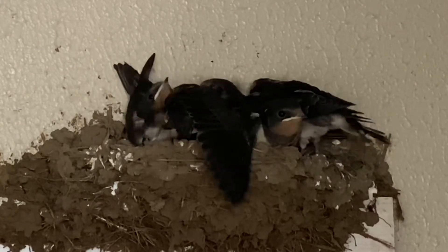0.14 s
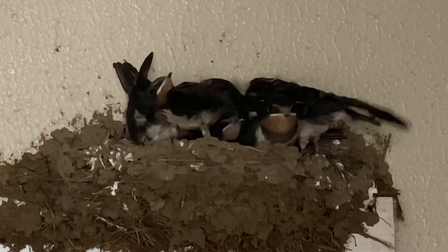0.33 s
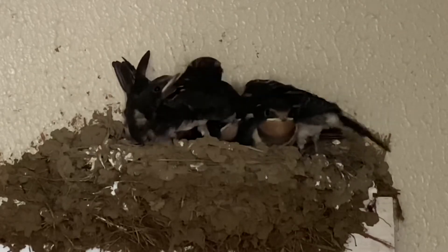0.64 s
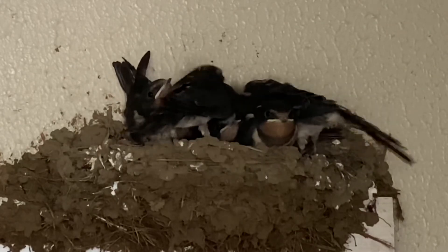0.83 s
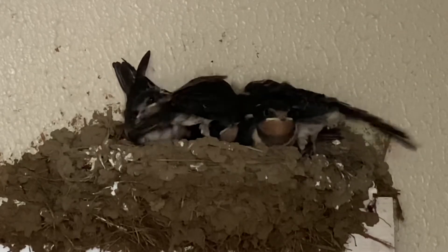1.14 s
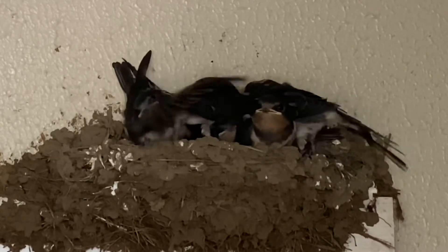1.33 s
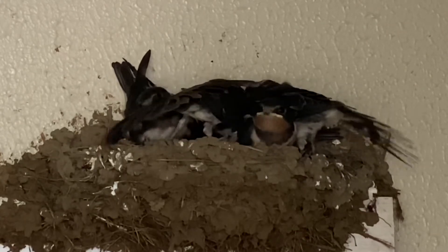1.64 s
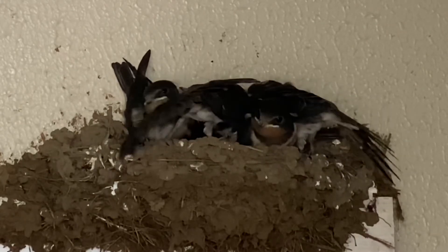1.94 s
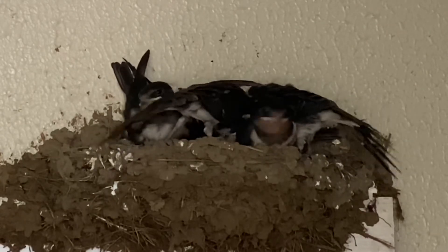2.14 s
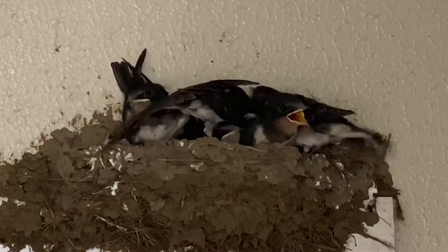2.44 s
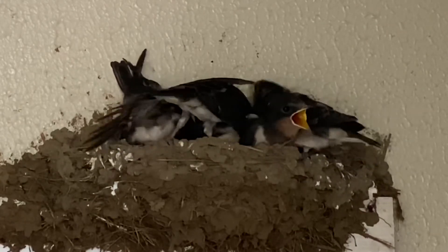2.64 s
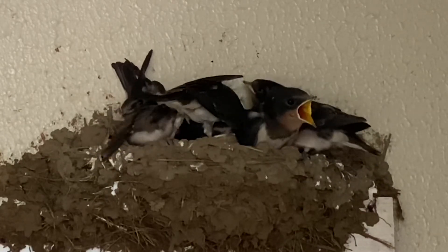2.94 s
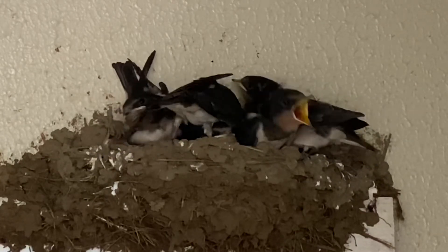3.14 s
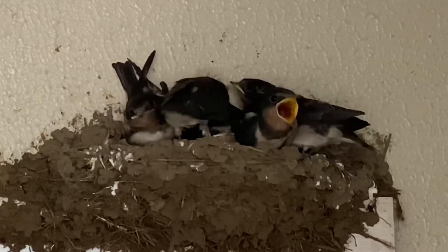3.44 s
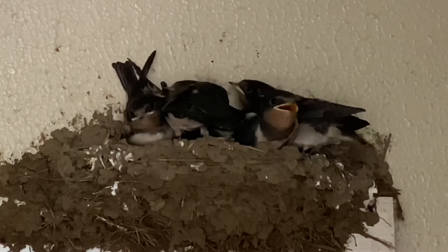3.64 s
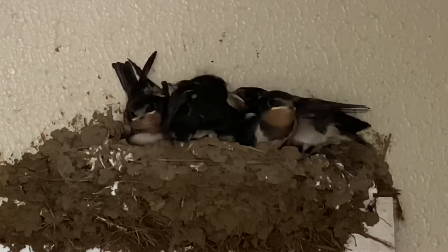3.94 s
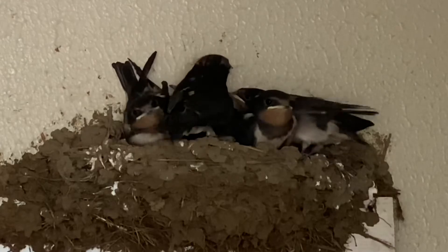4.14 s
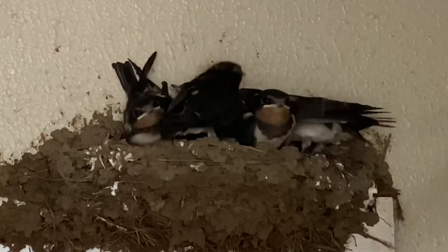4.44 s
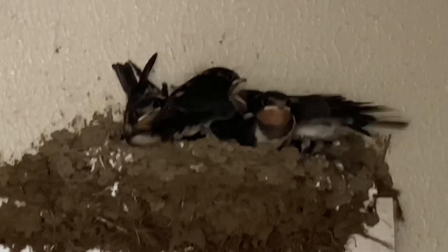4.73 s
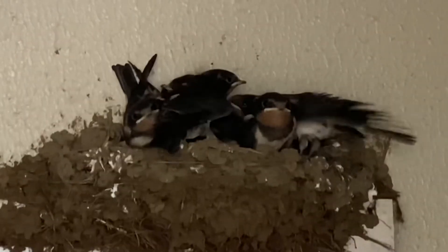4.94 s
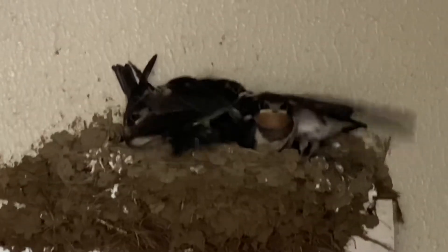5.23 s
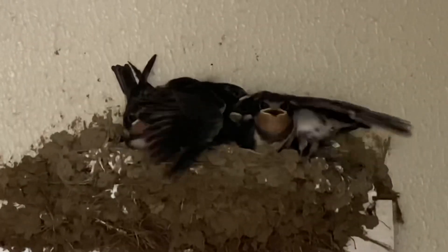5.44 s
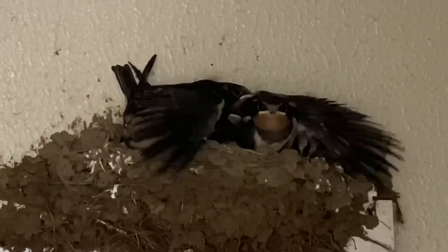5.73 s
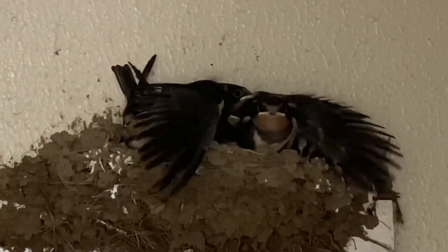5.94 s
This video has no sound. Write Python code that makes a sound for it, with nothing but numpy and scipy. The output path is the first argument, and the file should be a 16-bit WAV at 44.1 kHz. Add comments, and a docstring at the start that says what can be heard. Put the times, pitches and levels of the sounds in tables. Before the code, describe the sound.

Young swallows call from a mud nest close to the microphone beneath a hard, reverberant roof. Short raspy screeches and soft whimpers come first, then a run of long hoarse begging cries, quiet peeps, and sharp upswept squeaks. A heavy puff of air thumps the microphone late on, followed by another screech and swishing wings. A faint distant motor hum fades early over low outdoor rumble.

```python
"""A mud nest under a hard, echoing roof: swallow nestlings beg with hoarse, mostly long screeches, upswept
chirps and squeaks, and soft whimpers. Each voice is syrinx pulses and chopped hiss in a moving throat resonance.
They shuffle and flap: filtered noise makes swishing feathers, gritty scrabbling feet and ticking claws.
A gust of air thumps on the microphone as short swinging eddies inside a lumpy draught of noise.
A distant motor, a few wavering harmonics, hums and fades over a low outdoor rumble."""
import sys
import numpy as np
from scipy import signal
from scipy.fft import rfft, irfft, next_fast_len
from scipy.io import wavfile
from scipy.ndimage import uniform_filter1d, map_coordinates

SR = 44100
rng = np.random.default_rng(int(sys.argv[2]) if len(sys.argv) > 2 else 0)


def unload_wav(signal):
    """Save mono or channel-first audio to the path in sys.argv[1] as 16-bit WAV at rate SR, clipped to [-1, 1]."""
    wavfile.write(
        sys.argv[1],
        SR,
        np.round(np.clip(np.atleast_2d(signal).T, -1, 1) * 32767).astype(np.int16),
    )


N = 268569

# colour of chirps and whimpers: [f/Hz, relative level/dB]
SOFT_CALL_COLOUR = [(300, -23.5), (1000, 1), (1600, 3.5), (3000, -0.5), (4200, -3), (5300, -4.5),
                    (7300, -9), (8700, -13), (11500, -11.5), (15500, -17)]

FADE_DB = 17.5   # every call fades in from, and out to, this far below its level
RASP_ROUGH = .92   # roughness (0-1) as a sweep starts, and as screeches and sweeps die away


def from_db(db):
    """Decibels to gain."""
    return 10 ** (np.asarray(db) / 20)


def rms_one(x):
    """Scale to unit power."""
    return x / np.sqrt(np.mean(x ** 2) + 1e-20)


def at_hz(points, hz):
    """Read a table on a log-frequency axis."""
    known_hz, values = np.transpose(points)
    return np.interp(np.log(np.maximum(hz, 1)), np.log(np.maximum(known_hz, 1)), values)


def coloured(x, spectrum):
    """Filter a sound by the gains of an [f/Hz, level/dB] table."""
    size = next_fast_len(2 * len(x))   # padded so that the filter does not wrap round
    gain = from_db(at_hz(spectrum, np.fft.rfftfreq(size, 1 / SR)))
    return irfft(rfft(x, size) * gain, size)[:len(x)]


def filtered(x, order, edges_hz, kind):
    """Butterworth filter."""
    return signal.sosfilt(signal.butter(order, edges_hz, kind, fs=SR, output="sos"), x)


def drift(rate, size):
    """Smooth random wander of spread about 1 that changes about rate times a second."""
    knots = np.arange(size) * rate / SR
    return map_coordinates(rng.standard_normal(int(knots[-1]) + 2), [knots], order=3, mode="nearest")


def bell(t, centre, half_length):
    """A smooth swell and fade."""
    return np.exp(-np.minimum(((t - centre) / half_length) ** 2, 50))


def resonance(x, centre_hz, width_hz):
    """A two-pole resonance of peak gain 1 whose centre and width may move, stepped in short blocks."""
    out, state = np.zeros(len(x)), np.zeros(2)
    centre_hz = np.broadcast_to(centre_hz, len(x))
    radius = np.broadcast_to(np.exp(-np.pi * width_hz / SR), len(x))
    for i in range(0, len(x), 64):
        r = radius[i]
        zeros = [(1 - r * r) / 2, 0, (r * r - 1) / 2]
        poles = [1, -2 * r * np.cos(2 * np.pi * centre_hz[i] / SR), r * r]
        out[i:i + 64], state = signal.lfilter(zeros, poles, x[i:i + 64], zi=state)
    return out


def outdoors(t, waver=0.0049, motor_hz=102.7):
    """Low rumble of coloured noise and the wavering harmonics of a far motor that fades away."""
    # rumble colour: [f/Hz, relative level/dB]
    rumble_colour = [(20, -24.5), (40, -12.5), (63, 7), (90, -3), (130, -2.5), (220, -12), (350, -17.5),
                     (700, -24.5), (1500, -29), (4000, -43.5), (8000, -53), (15000, -59.5)]
    # rumble level over time: [t/s, level/dB]
    rumble_levels = [(0, -57), (.7, -56), (1.8, -57), (3.9, -54.5), (5.05, -56), (5.17, -61.5),
                     (6.09, -65.5)]
    # motor harmonics: [multiple of motor_hz, level/dB, steady until t/s, then fading/dB per s]
    motor_orders = [(2, -63.5, 1, 3.03), (3, -69.5, 0.93, 9.8), (4, -71.5, 1.3, 11)]
    rumble = rms_one(coloured(rng.standard_normal(N), rumble_colour))
    rumble = rumble * from_db(np.interp(t, *np.transpose(rumble_levels)))
    phase = 2 * np.pi * np.cumsum(motor_hz * (1 + waver * drift(5.4, N))) / SR
    hum = np.zeros(N)
    for multiple, db, until, fade in motor_orders:
        level_db = db - fade * np.maximum(t - until, 0) + 1.1 * drift(9.8, N)
        hum += from_db(level_db) * np.sin(round(multiple) * phase)
    return rumble + np.sqrt(2) * hum   # the root turns RMS level into sine amplitude


def draught(t, peak_s=4.686, peak_db=-31, rise_db_per_s=64, fall_db_per_s=65.5, lumpy_db=4.0):
    """Lumpy turbulence on the microphone: low noise that swells and dies away around the puffs."""
    # draught colour: [f/Hz, relative level/dB]
    draught_colour = [(20, -10.5), (55, 2.5), (110, -3), (200, -19.5), (500, -34), (1200, -44), (4000, -65)]
    level_db = peak_db - np.maximum(rise_db_per_s * (peak_s - t), fall_db_per_s * (t - peak_s))
    lumps = rng.standard_normal(N) * from_db(lumpy_db * drift(90, N))
    return from_db(level_db) * rms_one(coloured(lumps, draught_colour))


def gust(t, shrink=0.93, lag_s=.0001, unlike=0.3):
    """Each puff breaks into eddies, the smaller ones quicker and briefer; the ports feel them a little differently."""
    # puffs of air: [t/s, level/dB, half length/s, slope of the smaller eddies/dB per octave]
    puffs = [(4.518, -27, .013, -6), (4.669, -15.5, 0.019, -8), (4.704, -19.5, 0.027, -5),
             (4.734, -10, .025, 1.1), (4.757, -15.5, 0.02, -6), (4.884, -27.5, 0.019, -14)]
    # eddies within a puff, before the slope: [f/Hz, level/dB]
    eddies = [(42, -9.5), (69, 1), (92, -5), (135, -3.5), (200, -5.5), (290, -4.5), (470, -1.5), (790, -9),
              (1020, -11)]
    out = np.zeros((2, N))
    for s, db, half_length, slope_db in puffs:
        near = abs(t - s) < 4 * half_length
        port_time = t[near] - s - np.array([[0], [lag_s]])
        for hz, eddy_db in eddies:
            quickness = max(hz / eddies[1][0], 1)   # relative to the second eddy
            start = 2 * np.pi * rng.random() + unlike * rng.standard_normal((2, 1))
            swing = np.sin(2 * np.pi * hz * port_time + start)
            swell = bell(t[near], s, half_length / quickness ** shrink)
            out[:, near] += from_db(db + eddy_db + slope_db * np.log2(quickness)) * swell * swing
    return out


def feathers(t, grain_db=2.5, focus_db=7):
    """Barbs scrape past each other: a grainy swish under each stroke, with one band brought forward."""
    # wing and feather strokes: [t/s, half length/s, level/dB, focus f/Hz]
    strokes = [(0.562, 0.052, -55.5, 540), (0.506, 0.081, -58, 2560), (0.837, 0.1, -61, 786),
               (0.95, 0.18, -60, 2110), (1.843, 0.058, -63, 4940), (4.549, 0.088, -62, 4850),
               (5.573, 0.054, -57, 3450), (5.712, .11, -52.5, 3200), (5.926, 0.067, -60, 3300)]
    # swish colour: [f/Hz, relative level/dB]
    feather_colour = [(200, -15), (500, -0.5), (900, 2.5), (1500, -1.5), (3000, 1.5), (5000, -4.5),
                      (7500, -11), (8800, -20.5), (11500, -17), (15500, -24.5)]
    grain = rng.standard_normal(N) * from_db(grain_db * drift(400, N))
    swish = coloured(grain, feather_colour)
    out = np.zeros(N)
    for s, half_length, level_db, hz in strokes:
        focus = filtered(swish, 1, [hz / 1.5, min(hz * 2.0, SR / 2 - 1)], "band")
        out += from_db(level_db) * bell(t, s, half_length) * rms_one(swish + from_db(focus_db) * focus)
    return out


def scrabble(t, centre_s=4.574, half_length_s=0.29, level_db=-61.5, scratches_per_s=900, low_hz=7500):
    """Feet shifting on the rim of the nest: sparse random clicks make a fine, bright crackle of grit."""
    grit = rng.standard_normal(N) * (rng.random(N) < scratches_per_s / SR) + 1e-18
    grit = filtered(grit, 2, low_hz, "high")
    return from_db(level_db) * bell(t, centre_s, half_length_s) * rms_one(grit)


def claws(t, decay_s=0.00099, low_hz=4000, trim_db=-5.5):
    """Claws tick on dry mud: tiny bright cracks of noise that die at once."""
    # ticks: [t/s, level before the trim/dB]
    ticks = [(4.702, -30), (5.039, -34), (5.209, -41)]
    crack = rms_one(filtered(rng.standard_normal(N), 2, low_hz, "high"))
    strength = np.zeros(N)
    for s, db in ticks:
        decay = np.exp(-np.minimum(abs(t - s) / decay_s, 20))
        strength += from_db(db + trim_db) * (t >= s) * decay
    return crack * strength


def call(rows, colour, tone_db, tone_low_hz, throat_width_hz, throat_db, windpipe_db, jitter, flutter_db):
    """One call: unsteady syrinx pulses and the hiss they chop, shaped by windpipe, throat and open beak."""
    rows = np.array(rows)   # corners of the call: [t/s, level/dB, pitch f/Hz, throat resonance f/Hz, roughness 0-1]
    span = np.arange(int(rows[0, 0] * SR), int(rows[-1, 0] * SR))
    level_db, pitch_hz, throat_hz, rough = [np.interp(span / SR, rows[:, 0], c) for c in rows[:, 1:].T]
    rough, size = np.clip(rough, .1, 1), len(span)
    unsteady_hz = pitch_hz * (1 + jitter * np.sqrt(rough) * drift(900, size))
    phase = 2 * np.pi * np.cumsum(unsteady_hz) / SR
    pulses = sum(np.cos(k * phase + k * k) for k in np.arange(1, 15))
    # so small a throat radiates the lowest harmonics poorly
    pulses = rms_one(filtered(pulses, 3, [tone_low_hz, 7600], "band"))
    hiss = rms_one(rng.standard_normal(size) * (1 + 0.32 * np.cos(phase)))
    tone = from_db(tone_db) * np.sqrt(1 - rough) * pulses
    source = coloured(tone + np.sqrt(rough) * hiss, colour)
    # the purer the voice, the narrower and stronger the throat's peak
    throat = resonance(source, throat_hz, throat_width_hz * rough) / np.sqrt(rough)
    windpipe = (1 - rough) * resonance(source, 3006, 270)   # its peak stays put
    voice = source + from_db(throat_db) * throat + from_db(windpipe_db) * windpipe
    voice /= np.sqrt(uniform_filter1d(voice ** 2, size=300) + 1e-12)   # evened out, so the corners set the level
    out = np.zeros(N)
    out[span] = voice * from_db(level_db + flutter_db * drift(220, size))
    return out


def whimper_shape(start, length, level_db, *voice, attack_s=.026, release_s=0.024):
    """A whimper fades in, holds one pitch and fades out."""
    end = start + length
    return [(start - attack_s, level_db - FADE_DB, *voice),
            (start, level_db, *voice),
            (end, level_db, *voice),
            (end + release_s, level_db - FADE_DB, *voice)]


def whimpers():
    """Soft wavering calls through a narrower, more sharply tuned throat."""
    # whimpers: [start t/s, length/s, level before the trim/dB, pitch f/Hz, throat resonance f/Hz, roughness 0-1]
    whimper_rows = [ (0.249, 0.027, -47, 980, 2880, 0.3), (.475, 0.07, -54.5, 890, 4500, 0.21),
                    (0.787, .025, -58, 936, 3700, 0.36), (0.946, 0.021, -54.5, 919, 3650, 0.4),
                    (1.113, 0.11, -57.5, 905, 3600, 0.47), (1.984, 0.039, -48.5, 925, 2670, 0.47),
                    (3.659, 0.047, -58.5, 863, 2600, 0.65), (3.744, .135, -56.5, 811, 2420, 0.57),
                    (3.912, .055, -59, 935, 3750, 0.7), (4.05, 0.11, -56.5, 919, 3400, 0.7),
                    (5.164, 0.0075, -48, 777, 2190, 0.84)]
    calls = [call(whimper_shape(*row), SOFT_CALL_COLOUR, tone_db=-5, tone_low_hz=2400, throat_width_hz=590,
                  throat_db=7.5, windpipe_db=9.5, jitter=0.029, flutter_db=2.5) for row in whimper_rows]
    return from_db(-1.5) * sum(calls)


def sweep_shape(start, length, first_db, peak_db, low_hz, top_hz, first_hz, last_hz, sweep_s):
    """A rasp swells and clears to a whistle, which bends upward and breaks off."""
    attack_s, release_s, swell_db = .005, .008, 3.5   # swell: gain by the middle of the sweep
    clearing_rough, whistle_rough = .3, .17   # as the sweep begins, and from its middle on
    midway = .65   # share of the rise done by the middle of the sweep
    end, flat_hz = start + length, low_hz * (1 - .04)   # pitch creeps up to low_hz before the sweep
    midway_hz = low_hz + midway * (top_hz - low_hz)
    midway_throat_hz = first_hz + midway * (last_hz - first_hz)
    return [(start - attack_s, first_db - FADE_DB, flat_hz, first_hz, RASP_ROUGH),
            (start, first_db, flat_hz, first_hz, RASP_ROUGH),
            (end - sweep_s, peak_db - swell_db, low_hz, first_hz, clearing_rough),
            (end - sweep_s / 2, peak_db, midway_hz, midway_throat_hz, whistle_rough),
            (end, peak_db, top_hz, last_hz, whistle_rough),
            (end + release_s, peak_db - FADE_DB, top_hz, last_hz, RASP_ROUGH)]


def chirps():
    """Short upswept calls through a narrow throat."""
    # chirps: [start t/s, length/s, first level and peak level before the trim/dB, low pitch f/Hz,
    # top pitch f/Hz, first throat resonance f/Hz, last throat resonance f/Hz, sweep/s]
    chirp_rows = [ (1.539, 0.069, -59, -47.5, 923, 1005, 3650, 3900, 0.041),
                  (1.995, .06, -51.5, -40.5, 965, 1082, 4080, 4460, .026),
                  (4.672, .079, -49, -37.5, 984, 1067, 4050, 4100, .02)]
    calls = [call(sweep_shape(*row), SOFT_CALL_COLOUR, tone_db=-4.5, tone_low_hz=2700, throat_width_hz=1000,
                  throat_db=6, windpipe_db=16, jitter=.026, flutter_db=2.1) for row in chirp_rows]
    return from_db(-4.0) * sum(calls)


def squeaks():
    """Sharp calls aimed at the microphone: a rasp that tightens into a loud rising whistle."""
    # squeaks: [start t/s, length/s, first level and peak level before the trim/dB, low pitch f/Hz,
    # top pitch f/Hz, first throat resonance f/Hz, last throat resonance f/Hz, sweep/s]
    squeak_rows = [ (4.275, .063, -47.5, -31.5, 810, 1025, 2405, 3735, 0.022),
                   (5.012, .076, -48, -33, 839, 1004, 2400, 3400, .017)]
    # squeak colour: [f/Hz, relative level/dB]
    squeak_colour = [(300, -24.5), (900, -3.5), (1600, -2), (2600, -3.5), (4200, -2.5), (5500, -1.5),
                     (7300, -3.5), (8700, -0.5), (11500, -1.5), (15500, -11.5)]
    calls = [call(sweep_shape(*row), squeak_colour, tone_db=-8, tone_low_hz=2200, throat_width_hz=1200,
                  throat_db=12.0, windpipe_db=0, jitter=0.0093, flutter_db=0.5) for row in squeak_rows]
    return from_db(-2.0) * sum(calls)


def screech_shape(start, length, first_db, last_db, pitch_hz, first_hz, last_hz, rough):
    """A screech starts abruptly, clearer and a little sharp, then swells and roughens as the throat glides."""
    attack_s, release_s = .006, .035
    sharp_hz, first_rough = pitch_hz * (1 + .04), rough * 0.77
    end = start + length
    return [(start - attack_s, first_db - FADE_DB, sharp_hz, first_hz, first_rough),
            (start, first_db, sharp_hz, first_hz, first_rough),
            (start + length / 2, (first_db + last_db) / 2, pitch_hz, (first_hz + last_hz) / 2, rough),
            (end, last_db, pitch_hz, last_hz, rough),
            (end + release_s, last_db - FADE_DB, pitch_hz, last_hz, RASP_ROUGH)]


def screeches():
    """Hoarse, mostly long begging through a wide gape."""
    # screeches: [start t/s, length/s, first level and last level before the trim/dB, pitch f/Hz,
    # first throat resonance f/Hz, last throat resonance f/Hz, roughness 0-1]
    screech_rows = [ (.151, 0.134, -49.5, -42, 908, 4840, 4400, 0.56),
                    (1.189, 0.19, -49.5, -41.5, 929, 5000, 4100, 0.71),
                    (1.409, 0.034, -49.5, -45.5, 996, 3630, 3480, 1),
                    (2.134, 0.15, -50, -41.5, 928, 4640, 5050, 0.95),
                    (2.30, 0.35, -42, -41.5, 950, 5500, 6800, 0.86),
                    (2.742, 0.4, -42, -40.5, 959, 6400, 6600, 0.87),
                    (3.207, .235, -43, -38, 951, 6600, 6500, 0.92),
                    (4.199, 0.1, -49, -42, 920, 4800, 4460, 0.54),
                    (5.271, 0.21, -45.5, -40, 922, 4870, 5170, 0.83)]
    # screech colour: [f/Hz, relative level/dB]
    screech_colour = [(300, -22.5), (650, -9.5), (1050, -2), (1500, -5.5), (2600, 3.5), (3700, 2.5),
                      (4300, -1.5), (5700, -4.5), (7700, -7), (8500, -7), (11500, -10.5), (15500, -10)]
    calls = [call(screech_shape(*row), screech_colour, tone_db=-11, tone_low_hz=4070, throat_width_hz=1800,
                  throat_db=17.0, windpipe_db=5, jitter=.022, flutter_db=1.3) for row in screech_rows]
    return from_db(-2.0) * sum(calls)


def wall(x, lag_s=0.001063, echo_db=-12):
    """The wall right behind the nest: one very early reflection ribs the sound with evenly spaced bands."""
    late = np.interp(np.arange(N) - lag_s * SR, np.arange(N), x)
    return (x + from_db(echo_db) * late) / np.sqrt(1 + from_db(echo_db) ** 2)


def roof(x, gap_s=0.0053):
    """Dense reflections from wall and ceiling: noise bands, each dying at its own pace."""
    # time to fall by 60 dB: [f/Hz, t/s]
    roof_t60 = [(300, 1), (1000, 0.78), (3000, 1), (6000, 0.86), (10000, 0.53), (16000, 0.4)]
    t, edges = np.arange(SR) / SR, np.geomspace(200, 18000, 11)
    tail = np.zeros(SR)
    for low, high in zip(edges, edges[1:]):
        band = filtered(rng.standard_normal(SR), 2, [low, high], "band")
        tail += band * 1000 ** (-t / at_hz(roof_t60, np.sqrt(low * high)))
    tail *= t > gap_s
    return signal.fftconvolve(x, tail / np.sqrt(np.sum(tail ** 2)))[:N]


def two_ports(x):
    """Two close microphone ports hear nearly the same, but their phases part most in the top treble."""
    # scattered side signal: [f/Hz, side level/dB]
    side_width = [(60, -23.5), (200, -11), (700, 0.5), (1300, -4.5), (2400, -42), (4400, -13),
                  (8000, -32.5), (15000, -8)]
    # phase by which left leads right: [f/Hz, phase/rad]
    port_phase = [(0, 0.5), (2330, -0.5), (3010, 1), (5860, -0.0), (7750, -0.45), (8100, 1.87), (8870, 2),
                  (9560, 1.5), (10400, 0.7), (11600, 0.5), (12700, -3.5), (14100, -1.5), (15200, -4.5),
                  (15400, -5.5)]
    scatter = irfft(np.exp(2j * np.pi * rng.random(513)))
    side = coloured(signal.fftconvolve(x, scatter)[:N], side_width)
    size = next_fast_len(2 * N)
    turn = np.exp(.5j * at_hz(port_phase, np.fft.rfftfreq(size, 1 / SR)))   # half the phase on each port
    left = irfft(rfft(x + side, size) * turn, size)
    right = irfft(rfft(x - side, size) / turn, size)
    return np.array([left, right])[:, :N]


def scene():
    """The nest under its roof, the background, and air on the microphone."""
    t = np.arange(N) / SR
    begging = wall(screeches()) + feathers(t)
    soft = chirps() + whimpers()
    sharp = squeaks() + claws(t) + scrabble(t)
    echo = roof(from_db(-4) * begging + from_db(-3.5) * soft + from_db(-10) * sharp)
    return two_ports(begging + soft + sharp + echo + outdoors(t) + draught(t)) + gust(t)


def record(dry, ceiling=.85, cutoff_hz=15850):
    """The strongest peaks are rounded and the top is cut steeply."""
    rounded = dry / (1 + (dry / ceiling) ** 6) ** (1 / 6)
    return signal.sosfilt(signal.ellip(10, .1, 80, cutoff_hz, fs=SR, output="sos"), rounded)


dry = scene()
out = record(dry)
unload_wav(out)
```